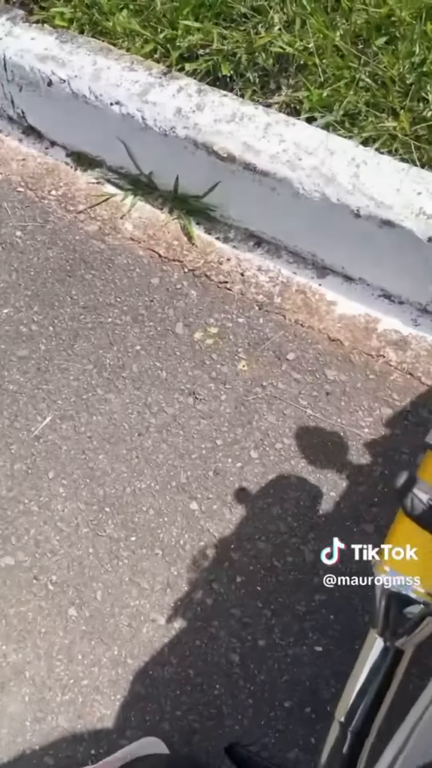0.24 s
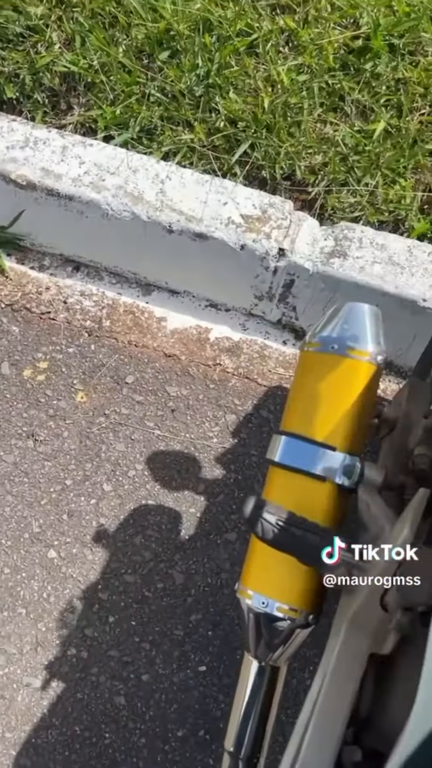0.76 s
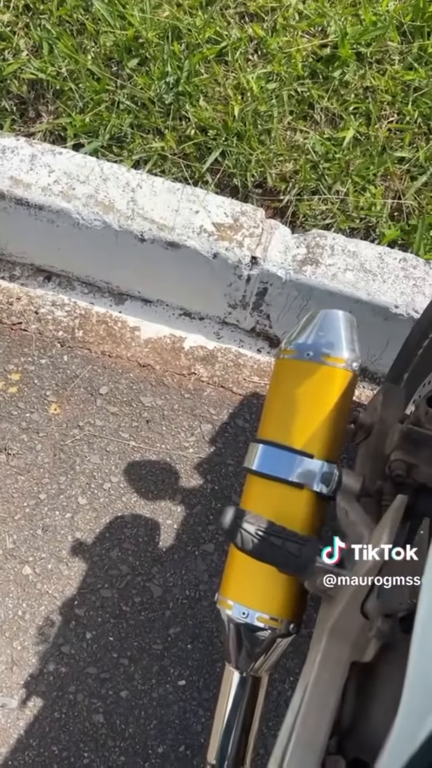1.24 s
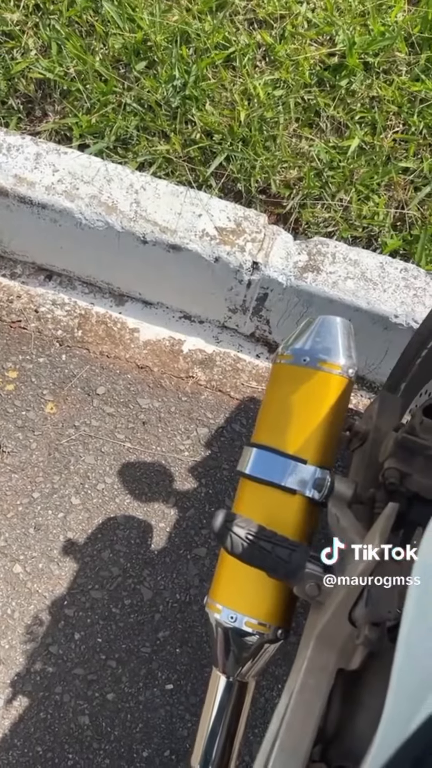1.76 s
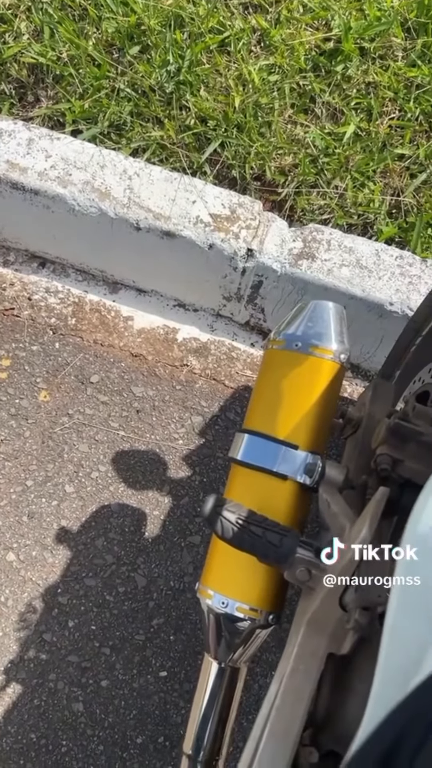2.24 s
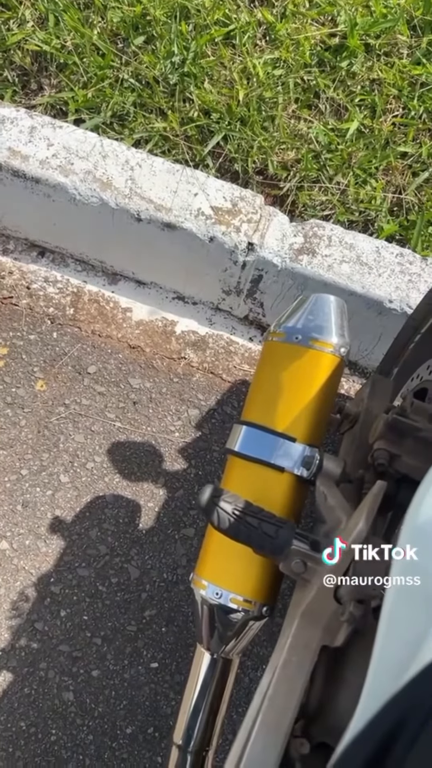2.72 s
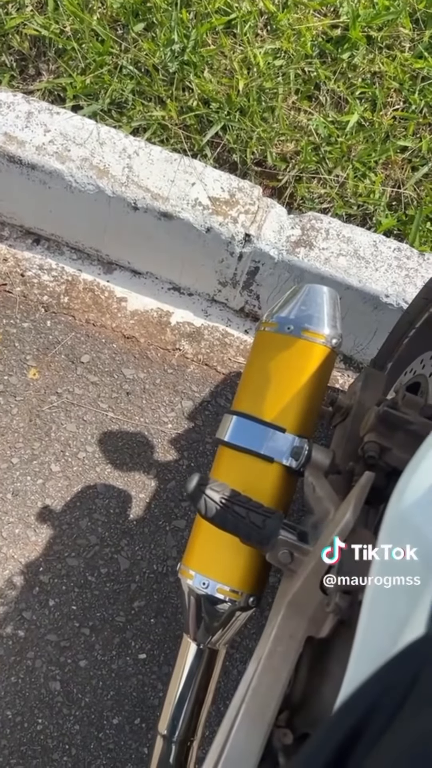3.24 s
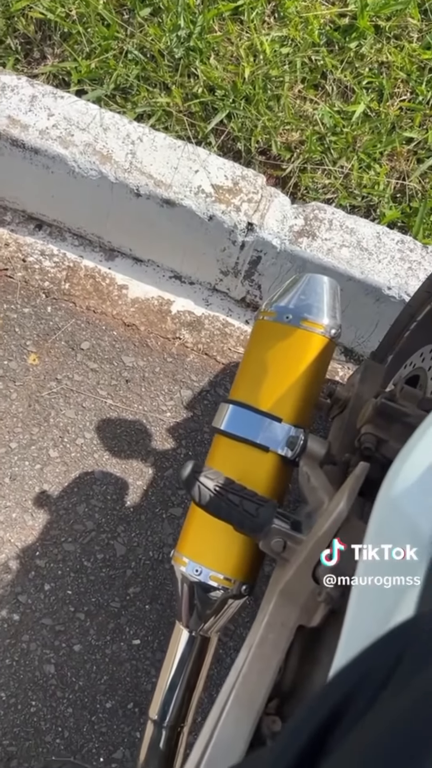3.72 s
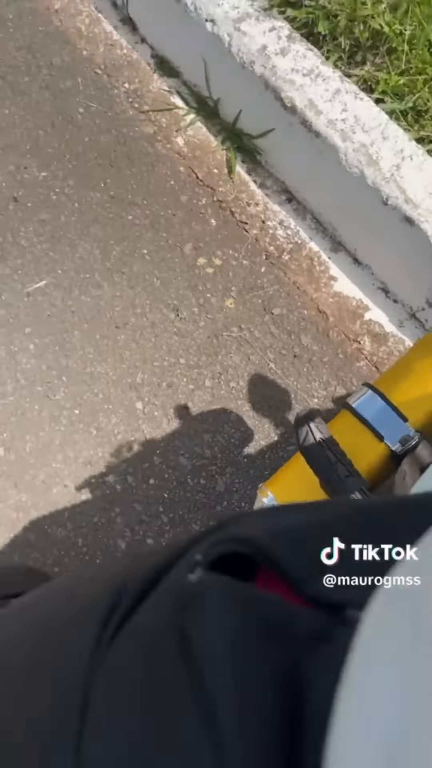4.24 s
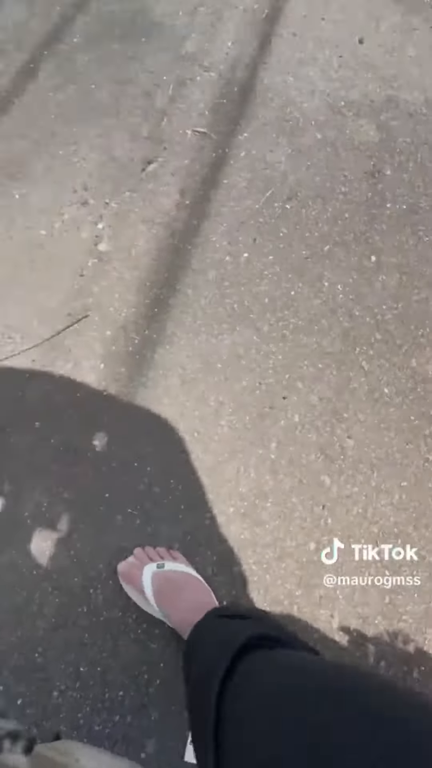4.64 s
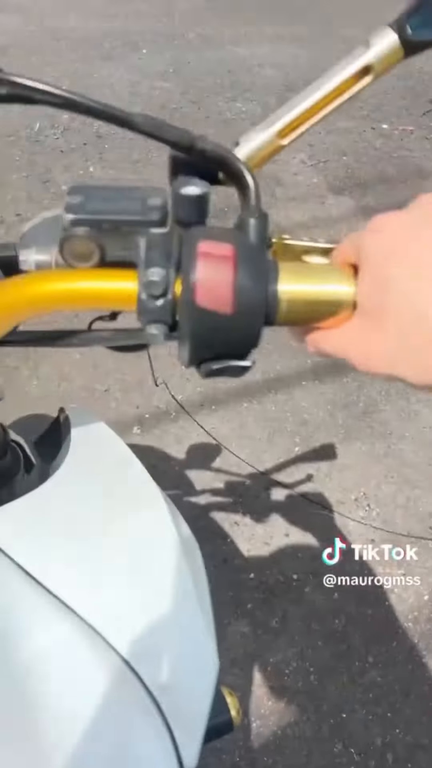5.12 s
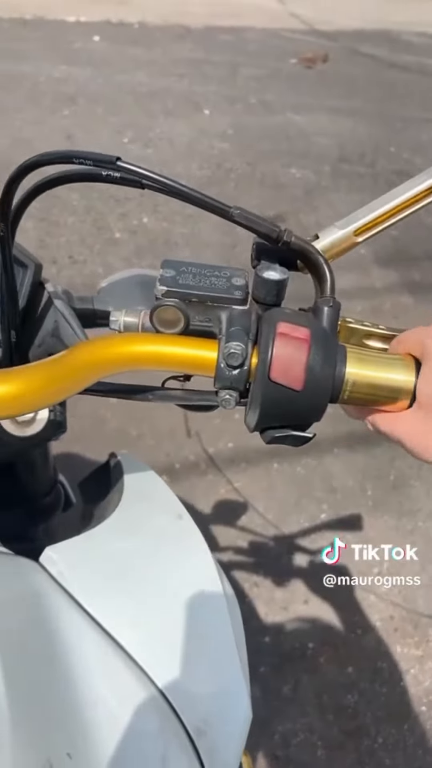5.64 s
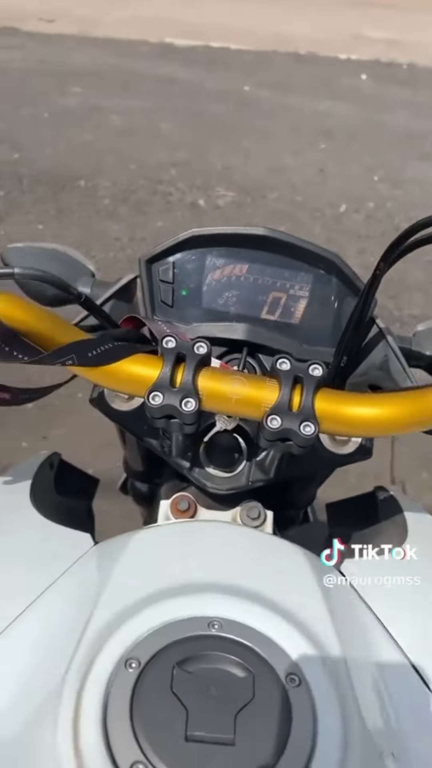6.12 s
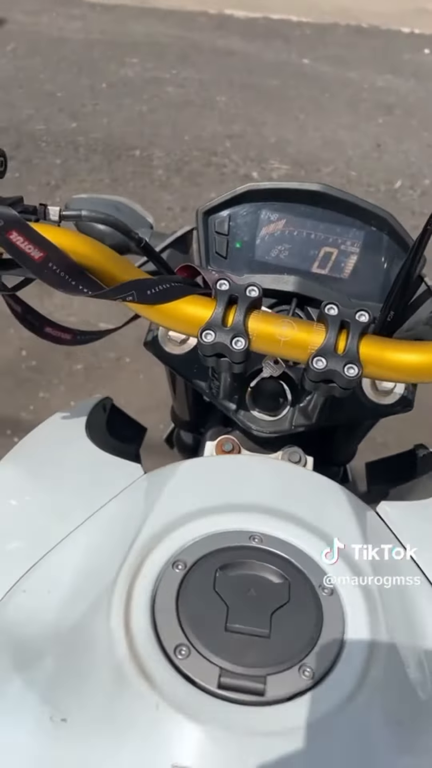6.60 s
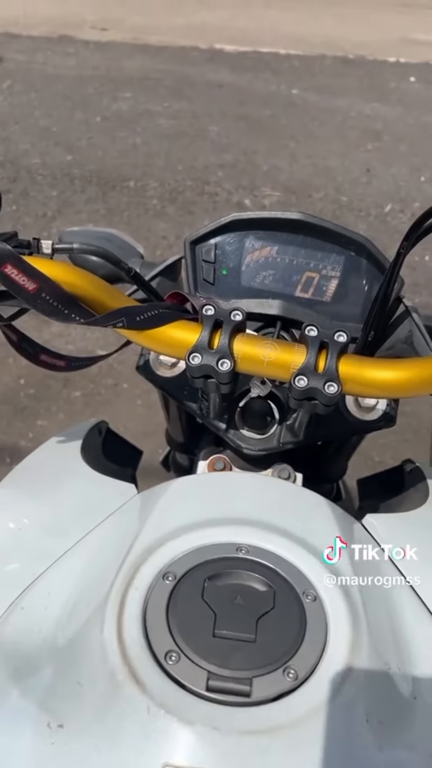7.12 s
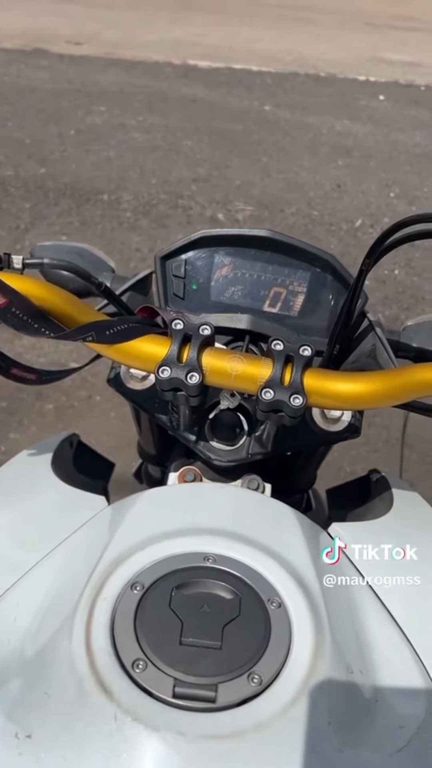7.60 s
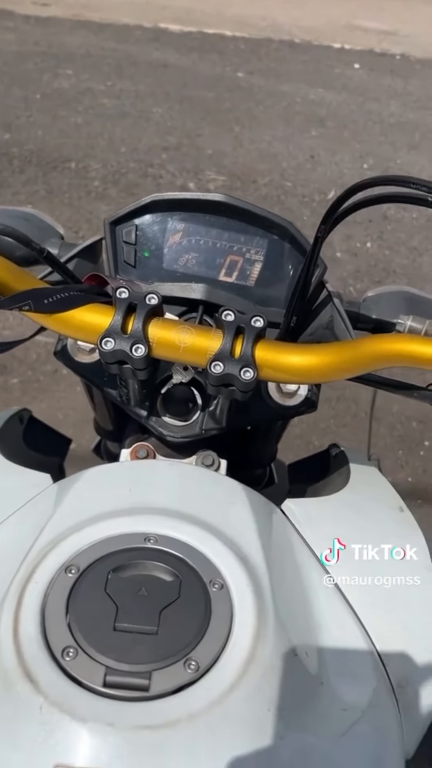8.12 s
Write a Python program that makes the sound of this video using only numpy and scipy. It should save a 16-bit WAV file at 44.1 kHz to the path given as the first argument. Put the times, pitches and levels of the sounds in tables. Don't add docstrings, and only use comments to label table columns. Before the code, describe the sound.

A one-cylinder motorcycle with a loud, dry exhaust idles slowly, then barks through increasingly hard revs, each falling away with rattly mechanical noise. It stutters briefly at top speed with separate hard cracks, then coasts down. The close phone moves from pipe to tank, so the later three blips are softer and hollow. Idle returns before an abrupt cut to a steady buzzing engine.

```python
import sys
import numpy as np
from scipy import signal
from scipy.fft import rfft, irfft
from scipy.io import wavfile
from scipy.ndimage import uniform_filter1d

SR = 44100
rng = np.random.default_rng(int(sys.argv[2]) if len(sys.argv) > 2 else 0)


def store_wav(level_fs):
    pcm = np.round(np.clip(np.atleast_2d(level_fs), -1, 1) * 32767)
    wavfile.write(sys.argv[1], SR, pcm.T.astype(np.int16))


def volts(x):
    e = np.asarray(x, float) / 20
    return 10 ** e


N = 368676
T = np.arange(N) / SR
CHANGE_S = 8.208, 8.263
LIMITER_S = 3.062, 3.52
LEAD_S = .1


def unit(x):
    return x / np.sqrt(np.mean(x ** 2))


def colour(x, points):
    hz, db = np.transpose(points)
    axis = np.log(np.arange(len(x) // 2 + 1) * SR / len(x) + 1)
    gain_db = np.interp(axis, np.log(hz), db, left=-70)
    return irfft(rfft(x) * volts(gain_db), len(x))


def walk(rate):
    hold = int(SR / rate)
    steps = np.repeat(rng.standard_normal(N // hold + 1), hold)
    return 1.58 * uniform_filter1d(uniform_filter1d(steps, hold), hold)[:N]


def by_speed(table, hz):
    speed, *columns = np.transpose(table)
    return np.array([np.interp(np.log(hz), np.log(speed), c) for c in columns])


# pull start in seconds, pull end in seconds, strokes a second at the start, at the end.
PULLS = [
    (.405, .599, 12.19, 27.88),
    (.851, 1.067, 22.33, 33.59),
    (1.377, 1.586, 25.34, 49.73),
    (1.999, 2.299, 36.54, 71.985),
    (2.791, 3.046, 53.01, 76.27),
    (5.078, 5.244, 22.85, 36.97),
    (5.578, 5.774, 30.945, 40.72),
    (6.729, 6.991, 15.2, 27.93),
]
# time in seconds, strokes a second.
STEADY = [
    (0, 11.7),
    (3.529, 76.644),
    (7.776, 11.11),
]


def crank():
    friction_hz = 33.27
    flywheel_s, first_turn = .04, -.293
    start, end, low, high = np.transpose(PULLS)
    s, hz = np.transpose(sorted([*zip(start, low), *zip(end, high), *STEADY]))
    hz = np.exp(np.interp(T, s, np.log(hz + friction_hz))) - friction_hz
    hz = uniform_filter1d(hz, size=int(flywheel_s * SR))
    return hz, np.cumsum(hz) / SR + first_turn


# start in seconds, end in seconds, bark change in dB,
# crack change in dB, choke in dB on the stroke after it snaps shut.
THROTTLE = [
    (0.404, 0.593, 1, -0.5, -13),
    (.89, 1.016, 0.5, -0.5, 0.5),
    (1.366, 1.589, -1, 0, -16.5),
    (2, 2.311, 1, 0.5, -10),
    (2.783, 3.09, 1.5, -0.5, 0),
    (5.1, 5.244, -11.5, -9, -2.5),
    (5.608, 5.731, -9.5, -11.5, -0.5),
    (6.747, 6.988, -14.5, -26.5, -0.5),
]
# time in seconds, share of the way, bass change in dB.
MOVE = [(0, 0.056, 2.5), (1.4, 0, -1), (2.5, 0.086, 1.5), (3.55, 0.21, -2), (3.95, 0.56, 0.5),
        (4.4, 0.94, -3), (5, 1, -4), (5.6, 1, -1), (6.3, 0.99, 0), (7.1, 0.92, 2.5), (8.2, 0.83, 3)]
# strokes a second in Hz, boom, thud, bark and crack in dB.
PULLING = [(14.2, -7, -16, -10.5, -23), (23.8, -16, -14.5, -8, -18), (29.6, -15.5, -20, -10.5, -18),
           (45.2, -21.5, -28, -16.5, -19.5), (60.4, -18.5, -25, -17.5, -16.5),
           (72.4, -27.5, -23.5, -23.5, -19.5)]
COAST_NEAR = [(12.4, -7, -9.5, -13, -34.5), (24, -8, -14.5, -23.5, -47), (31.7, -16, -13.5, -19, -38),
              (38.8, -17.5, -13, -20, -43), (47.5, -31, -18, -20, -48.5), (57, -34, -22, -18, -41.5),
              (68, -34.5, -29, -19.5, -33.5), (76, -27, -25.5, -18, -31)]
COAST_FAR = [(10.37, -18, -24.5, -32.5, -68), (12.9, -30.5, -32.5, -43, -71), (14, -20, -30.5, -30.5, -71),
             (15.7, -26, -38, -51, -61), (25.3, -20.5, -29, -42, -63), (31.1, -26, -24.5, -36.5, -52),
             (39, -29, -23, -31, -63), (48.3, -29, -25.5, -27.5, -86), (63.3, -42, -29.5, -28, -41)]
# boom, thud, bark, crack in dB.
UNLIT_DB = [-34.5, -21.5, -23.5, -30]
# boom, thud, bark, crack in dB.
TANK_DB = [-11, -7.5, -1.5, 0]
FIRST_STROKE = [0.23, 0.38, 0.47, 0.27]
LAST_STROKE = [0.62, 0.99, 0.93, 0.52]


def phone_way():
    return np.clip(np.interp(T, *np.transpose(MOVE)[:2]), 0, 1)


def strength(s, hz):
    build_strokes, thin_s = 1.45, 0.036
    move_s, way, bass = np.transpose(MOVE)
    far, bass_db = np.clip(np.interp(s, move_s, way), 0, 1), np.interp(s, move_s, bass)
    coast = (1 - far) * by_speed(COAST_NEAR, hz) + far * by_speed(COAST_FAR, hz)
    coast += np.outer([1, 0.73, 0.36, 0.071], bass_db)
    db = coast.copy()
    jet_db = 3 * far - 1
    for a, b, bark_db, crack_db, choke_db in THROTTLE:
        pull = by_speed(PULLING, hz) + np.outer(TANK_DB, far)
        pull += np.array([[0], [0], [bark_db], [crack_db]])
        on = (s > a) & (s < b)
        build = np.c_[FIRST_STROKE] + (s - a) * hz / build_strokes
        thin = np.c_[LAST_STROKE] + (b - s) / thin_s
        load = on * np.clip(np.minimum(build, thin), 0, 1)
        just_shut = (s > b) & (s < b + 1 / hz)
        db += load * (pull - coast) + np.outer([.4, 3.6, 1.2, 1.5], choke_db * just_shut)
        jet_db = jet_db * ~on
    held = (s > LIMITER_S[0]) & (s < LIMITER_S[1])
    return np.where(held, np.array(UNLIT_DB)[:, None], db), jet_db


def ring(modes, lag):
    delay_s, build_s = lag
    hz, t60, db = np.transpose(modes)[:, :, None]
    t = np.clip(T[:SR // 3] - delay_s * hz[0] / hz, 0, None)
    sign = (-1.) ** np.arange(len(modes))[:, None]
    decay = volts(db - 60 * t / t60) * (1 - np.exp(-t / build_s))
    y = np.sum(sign * decay * np.sin(2 * np.pi * hz * t), axis=0)
    return y / np.sqrt(np.sum(y ** 2) * 30 / SR)


def strike(times, db, blur_s=0):
    at = (times + LEAD_S) * SR
    span = np.arange(-300, 301)
    wide = np.clip(blur_s * SR + 0 * at, .6, 70)[:, None]
    bell = np.exp(-.5 * ((span - at[:, None] % 1) / wide) ** 2) / wide / np.sqrt(2 * np.pi)
    keep = np.exp(.5 * (2 * np.pi * 280 * wide / SR) ** 2)
    out = np.zeros(N + SR)
    np.add.at(out, at.astype(int)[:, None] + span, volts(db)[:, None] * bell * keep)
    return out


def through(pulses, body):
    return signal.fftconvolve(pulses, body)[int(LEAD_S * SR):][:N]


# start in seconds, end in seconds.
SPARK = [
    (3.141, 3.181),
    (3.247, 3.299),
    (3.376, 3.416),
    (3.481, 3.521),
]
# boom, thud, bark, crack in dB.
SPARK_DB = [9.5, -4.5, 1, 11]
# pitch in Hz, time to fade by 60 dB in seconds, level in dB.
BOOM = [(67.25, 0.19, -3), (91.8, 0.062, -1.5)]
THUD = [(143.3, 0.053, 0)]
BARK = [(213, 0.058, -2), (302.9, 0.058, 6.5), (379.7, 0.049, -3.5), (477.7, 0.037, 5), (588, 0.049, -5.5),
        (823, 0.018, 2.5), (1027, 0.012, 8.5), (1257, 0.027, 3.5)]
CRACK = [(636, 0.019, -17.5), (959, 0.015, 11.5), (1350, 0.012, 14.5), (1752, 0.016, 9), (2257, 0.04, 0),
         (2560, 0.051, -12), (3410, 0.019, 7.5), (4400, .012, -21)]
HONK = [(237, 0.037, 7), (458, 0.039, -2.5), (548, 0.014, -12), (910, 0.026, -6.5)]
# pitch in Hz, level in dB per Hz.
JET = [(880, -3), (1500, -4), (1750, -0.5), (2010, -13), (2330, -3), (2810, -11.5), (3550, -10),
       (3880, -10), (7060, -19.5), (8590, -27.5), (11500, -35.5), (13600, -26), (15600, -36.5)]
RUMBLE = [(22, -8), (45, 11), (100, 9), (250, 0.5), (450, -6), (700, -59.5)]
# time in seconds, level in dB.
GULP = [
    (0.422, -22),
    (.484, -19),
    (0.537, -28),
    (0.938, -24),
    (1.411, -28),
]


def exhaust(hz, turns):
    ahead_s, bark_lag, crack_lag = .0022, (0.0034, 0.0011), (0.0013, 0.00047)
    count = np.arange(int(turns[int(CHANGE_S[0] * SR)]) + 1)
    chance = rng.standard_normal((len(count) + 1, 5)).T
    times = np.interp(count + .002 * chance[4, 1:], turns, T) - ahead_s
    times = np.r_[times[0] - 1 / hz[0], times]
    rate = np.interp(times, T, hz)
    sparked = sum((times + ahead_s > a) & (times + ahead_s < b) for a, b in SPARK)
    columns, jet_db = strength(times + ahead_s, rate)
    scatter_db = [.8, .6, .6, .8]
    boom, thud, bark, crack = (c + up * sparked + v * r
                               for c, up, v, r in zip(columns, SPARK_DB, scatter_db, chance))
    bark = bark - 6.9 * ((times > LIMITER_S[0]) & (times < LIMITER_S[1]) & (sparked == 0))
    blur_s = .0004 * volts(-.4 * (bark - thud)) * (rate / 30) ** -.38
    rumble_db = np.interp(T, times, thud) - 13 + 5.5 - 9.2 * (turns % 1)
    rumble = volts(rumble_db) * unit(colour(rng.standard_normal(N), RUMBLE))
    idle_lag_s = 0.0025 * np.clip((16 - rate) / 3, 0, 1)
    times = times + 2.76 * np.clip(blur_s - .0003, 0, .0012) + idle_lag_s
    pipe = through(strike(times, boom), ring(BOOM, (0.0068, 0.015)))
    pipe += through(strike(times, thud), ring(THUD, (0.0047, 0.0073)))
    pipe += through(strike(times, bark, blur_s), ring(BARK, bark_lag))
    pipe += through(strike(times, crack, 0.32 * blur_s), ring(CRACK, crack_lag))
    unlit = times[(times > LIMITER_S[0]) & (times < LIMITER_S[1]) & (sparked == 0)]
    pipe += through(strike(unlit, -19 + 3.7 * chance[0, :len(unlit)]), ring(HONK, bark_lag))
    t = T[:SR // 20]
    jet_s = 0.0026
    puff = 3 * t / jet_s * np.exp(1 - t / jet_s)
    jet = through(strike(times + crack_lag[0], crack + jet_db - 6.5), puff)
    gulp = through(strike(*np.transpose(GULP)), np.hanning(SR // 55))
    tick = through(strike(times + crack_lag[0], crack + jet_db - 31), 3 * np.exp(-t / .004))
    fizz = colour(rng.standard_normal(N), [(11500, -37), (12500, -6), (14000, -22), (15700, 0.5)])
    hiss = (jet + gulp) * unit(colour(rng.standard_normal(N), JET))
    return pipe + rumble + hiss + tick * unit(fizz)


# strokes a second in Hz, level at the silencer in dB, level above the tank in dB.
CLATTER = [(10.2, -30.5, -55.5), (13.6, -34.5, -61), (16.7, -33, -59.5), (24, -30, -55), (30.4, -33, -54.5),
           (40, -32.5, -49.5), (48, -34, -48), (57.7, -31, -42.5), (77, -29, -34.5)]


def clatter_db(hz):
    rise_s, linger_s = 0.034, 0.24
    far = phone_way()
    load = np.max([np.clip((T - a) / rise_s, 0, 1) * np.exp(-np.clip(T - b, 0, None) / linger_s)
                   for a, b, *_ in THROTTLE], axis=0)
    near_db, far_db = by_speed(CLATTER, hz) + np.outer((2.5, 5), load)
    return (1 - far) * near_db + far * far_db


# pitch in Hz, level in dB per Hz.
SLOW = [(290, -40), (500, -8), (603, -11.5), (696, -5.5), (956, -8), (1260, -6.5), (1540, -7.5),
        (2660, -11.5), (3390, -22.5), (4400, -19), (10900, -32.5), (13900, -28.5), (15600, -37)]
FAST = [(400, -30), (700, -17), (1100, -15), (1500, -11), (2100, -11), (2400, -14), (4000, -20),
        (8900, -29), (11000, -38), (13700, -26), (15600, -32)]
# time in seconds, share turned.
AWAY = [
    (3.9, 0),
    (4.4, 0.78),
]
# pitch in Hz, level in dB.
SHADOW = [(20, 11), (3000, 2.5), (8000, 1.5), (13000, -5)]
# start in seconds, end in seconds.
WHISTLE = [
    (.33, .42),
    (.55, 1.38),
    (2.2, 2.68),
    (2.86, 3.1),
    (3.22, 3.33),
    (3.4, 5.1),
    (5.2, 5.33),
    (5.68, 6.27),
]


def clatter(hz, turns):
    fast = np.clip((hz - 33) / 30, 0, 1)
    throb = .85 + .8 * np.exp(-((turns - .04) % 1) / .25) + .25 * np.exp(-((turns + .45) % 1) / .12)
    grit = volts(1.94 * np.clip(rng.exponential(size=N), 0, 4.5)) * rng.standard_normal(N)
    low = unit(colour(grit, SLOW)) * volts(1.3 * walk(25))
    high = unit(colour(grit[::-1], FAST)) * volts(0.47 * walk(30))
    noise = np.sqrt(1 - fast) * low + np.sqrt(fast) * high
    puff = .6 * (1 - fast) * np.clip((hz - 21) / 8, -1.2, 1)
    noise = noise * throb * (throb / 1.15) ** puff
    away = np.interp(T, *np.transpose(AWAY))
    noise = (1 - away) * noise + away * colour(noise, SHADOW)
    on = sum((T > a) & (T < b) for a, b in WHISTLE)
    whistle = on * volts(-22 + 2.5 * walk(20)) * np.sin(2 * np.pi * 15332 * T)
    return (noise * volts(-1.0) + whistle) * volts(clatter_db(hz))


# multiple of the stroke rate, level in dB.
SECOND = [(1, 2.5), (2, 6.5), (3, 10), (4, 4), (5, 6.5), (6, -1), (7, -14), (8, -16), (9, -13), (10, -16.5)]
# pitch in Hz, level in dB per Hz.
SECOND_HISS = [(400, -12), (900, -3), (1350, 3), (1700, -9), (2250, -3), (2600, -10), (4000, -12),
               (6300, -20), (6500, -60), (7800, -60), (8000, -18), (9600, -18), (9900, -70)]


def second_engine():
    turns = np.cumsum(np.interp(T, (CHANGE_S[1], T[-1]), (67.5, 64.7))) / SR
    tone = sum(volts(db) * np.sin(2 * np.pi * k * turns + 0.207 * k ** 2) for k, db in SECOND)
    hiss = colour(rng.standard_normal(N), SECOND_HISS)
    return unit(tone) * volts(-19.5) + unit(hiss) * volts(-35.5)


# pitch in Hz, level in dB.
BEHIND = [(20, -2), (170, 0), (240, -4), (340, 3), (480, -4.5), (700, 5), (2500, -2.7), (5500, -6.5),
          (15900, 3)]


def scene():
    hz, turns = crank()
    pipe, far = exhaust(hz, turns), phone_way()
    bike = (1 - far) * pipe + far * colour(pipe, BEHIND) + clatter(hz, turns)
    return np.where(T < np.mean(CHANGE_S), bike * volts(0.44), second_engine())[None]


def roll_off(x):
    return signal.sosfilt(signal.butter(12, 15760, fs=SR, output="sos"), x)


def record(dry):
    thin = signal.sosfilt(signal.butter(2, 45, "high", fs=SR, output="sos"), dry)
    fade_out, fade_in = (CHANGE_S[0] - T) / 0.00075, (T - CHANGE_S[1]) / 0.0023
    gate = np.clip(np.maximum(fade_out, fade_in), 0, 1)
    return roll_off(gate * np.tanh(thin * 0.78) / 0.91)


dry = scene()
out = record(dry)
store_wav(out)
```